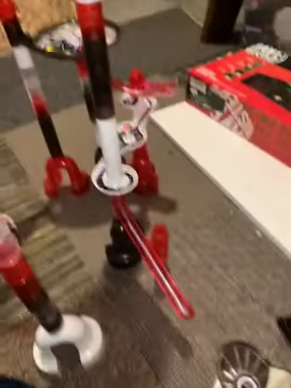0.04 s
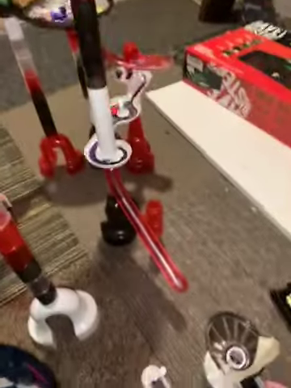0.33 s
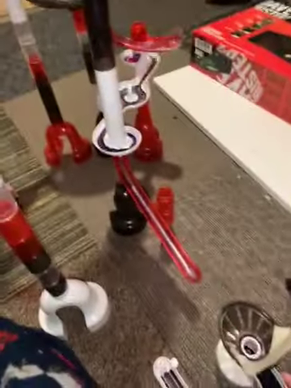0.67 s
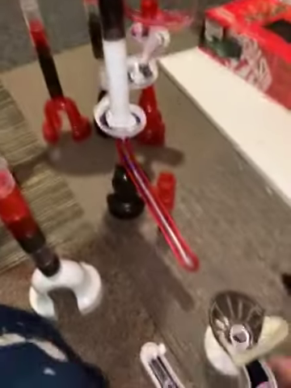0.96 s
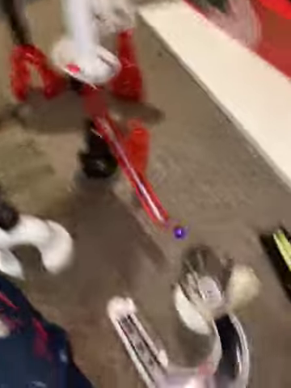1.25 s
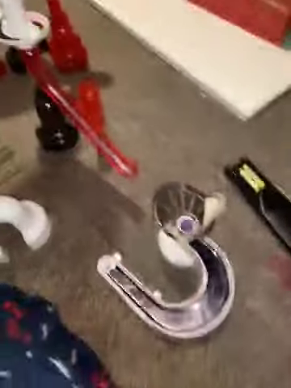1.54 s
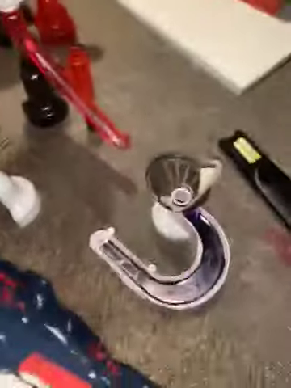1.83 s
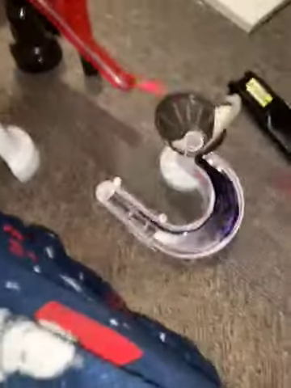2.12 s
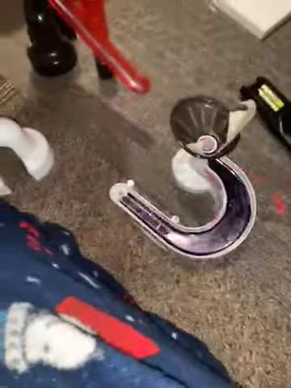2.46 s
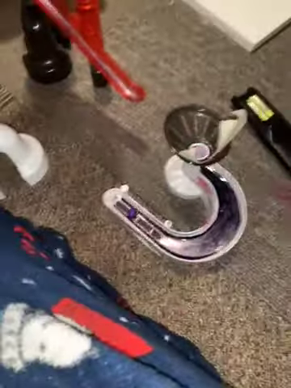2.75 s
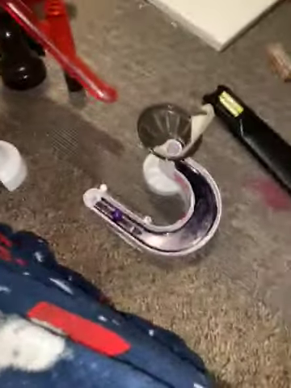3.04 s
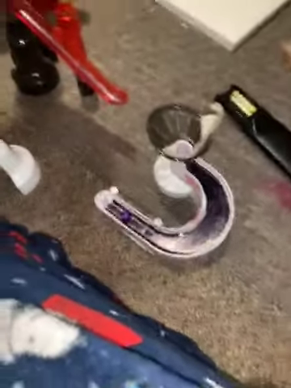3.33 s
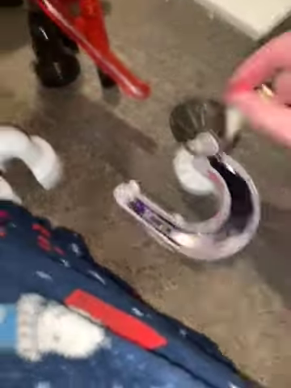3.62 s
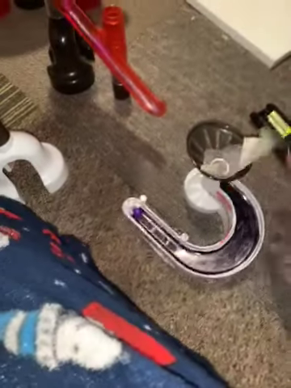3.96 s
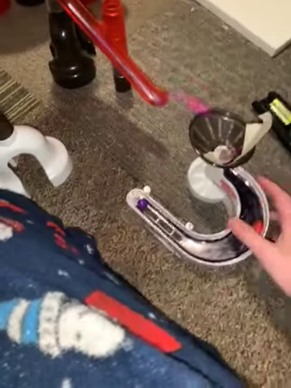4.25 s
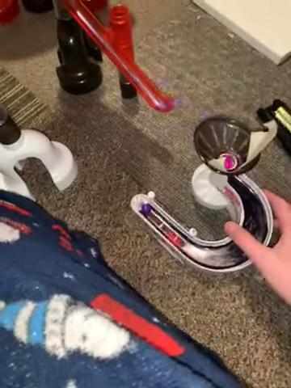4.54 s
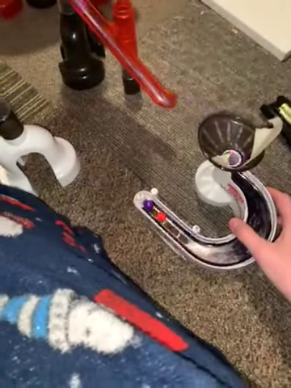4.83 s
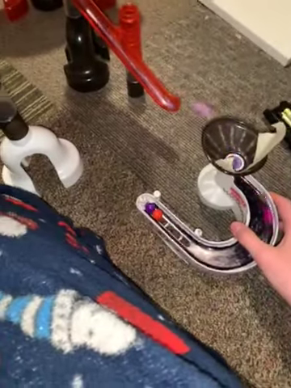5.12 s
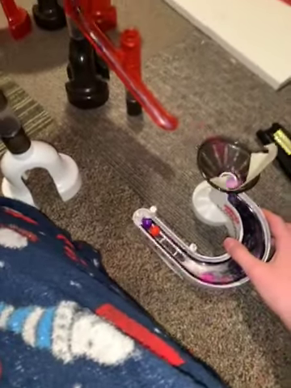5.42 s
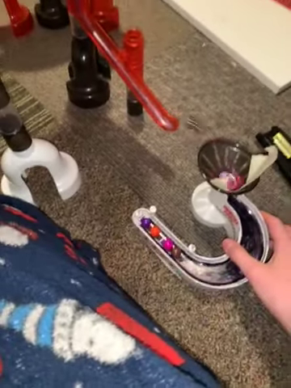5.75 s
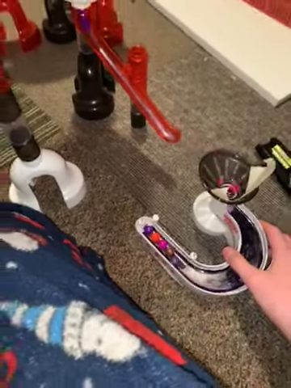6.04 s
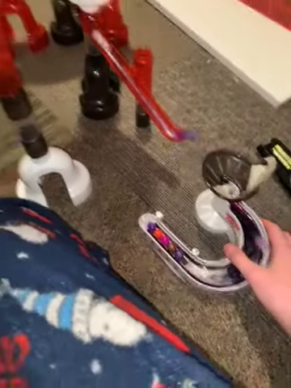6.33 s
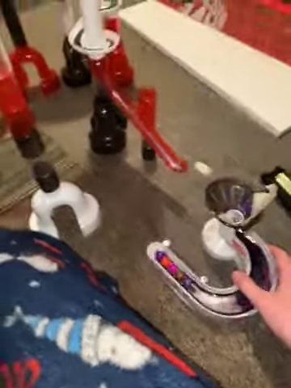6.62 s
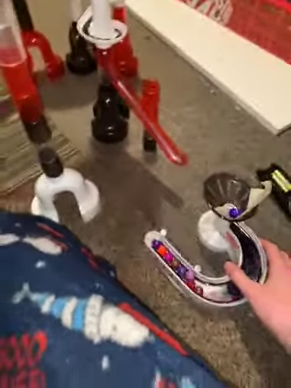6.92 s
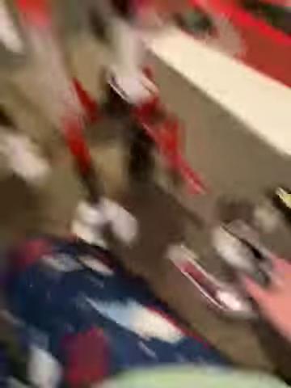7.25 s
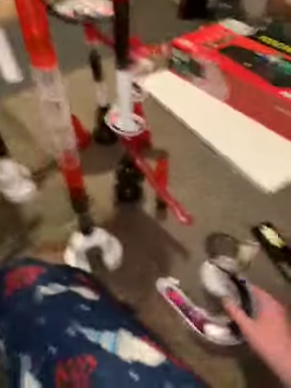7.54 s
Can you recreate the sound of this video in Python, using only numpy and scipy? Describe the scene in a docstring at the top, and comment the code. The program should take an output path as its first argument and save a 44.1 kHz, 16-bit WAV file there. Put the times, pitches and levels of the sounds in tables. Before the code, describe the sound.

Small marbles clatter continuously along a plastic track indoors, with hollow knocks, a rolling rasp and sharp dry taps.

```python
"""Glass marbles run down a plastic marble run on carpet in a small room, over a faint mains hum.
First they roll through the tubes of a tower, droning, rasping and knocking hollow notes out of the walls.
From about 1.4 s they drop into a funnel close by and bounce; then they rattle down a chute, ending in
scattered dry taps. All along the thin plastic rings briefly, glass clicks on glass and the room answers."""
import sys
import numpy as np
from scipy import signal
from scipy.fft import rfft, irfft, next_fast_len
from scipy.io import wavfile

SR = 44100
rng = np.random.default_rng(int(sys.argv[2]) if len(sys.argv) > 2 else 0)


def wrap_up_sound(samples):
    """Save the sound to the file named by the first command line argument, as 16-bit audio."""
    columns = np.atleast_2d(samples).T
    # keep every value between -1 and 1, then stretch to whole-number steps
    tamed = np.clip(columns, -1, 1)
    steps = np.round(tamed * 32767).astype(np.int16)
    wavfile.write(sys.argv[1], SR, steps)


N = 334278

# an impact's four registers (knock, ring, clack, tick): low f/Hz, high f/Hz, decay/(dB/ms), snap height
REGISTERS = [(472, 870, 2, 11.6), (1072, 1810, 0.94, 6.8), (2090, 6640, 1.4, 1.45), (5400, 15600, 1.6, 5)]
# fader moves of the rolling: t/s, track drone level/dB, contact rasp level/dB
ROLLING_LEVELS = [(0.0, -27.5, -31.5), (0.19, -39, -30), (0.36, -36, -33.5), (1.54, -36.5, -39.5),
                  (1.92, -33, -34), (2.09, -37.5, -31), (2.34, -38.5, -32), (2.47, -46, -41.5),
                  (3.17, -39.5, -36), (3.34, -40, -38), (3.74, -40, -33), (3.93, -39.5, -43),
                  (4.24, -42, -40), (4.66, -42, -35), (5.22, -39, -34), (5.57, -41.5, -37),
                  (7.16, -46, -39.5), (7.58, -43.5, -36.5)]


def from_db(db):
    """Decibels to amplitude."""
    return 10 ** (np.asarray(db) / 20)


def rms_one(x):
    """Scales a sound to rms 1."""
    return x / np.sqrt(np.mean(x ** 2) + 1e-20)


def at_hz(points, hz):
    """Reads a table along a log-frequency axis."""
    points = np.array(points)
    return np.interp(np.log(np.maximum(hz, 1)), np.log(points[:, 0]), points[:, 1])


def band(x, low_hz, high_hz, order=2):
    """Causal band-pass."""
    edges_hz = [low_hz, min(high_hz, SR / 2 - 100)]
    return signal.sosfilt(signal.butter(order, edges_hz, "band", fs=SR, output="sos"), x)


def coloured(x, spectrum):
    """Puts an EQ curve on a continuous sound."""
    size = next_fast_len(N)
    gain = from_db(at_hz(spectrum, np.fft.rfftfreq(size, 1 / SR)))
    return irfft(rfft(x, size) * gain, size)[:N]


def resonance(x, hz, width):
    """A single mode, gain 1 at its peak."""
    r = np.exp(-np.pi * width / SR)
    feedback = [1, -2 * r * np.cos(2 * np.pi * hz / SR), r * r]
    return signal.lfilter(np.array([1, 0, -1]) * (1 - r * r) / 2, feedback, x + 1e-18)


def drift(rate):
    """A random modulator that glides to a new value rate times a second."""
    knots = rng.standard_normal(4000)
    return np.interp(np.arange(N) / SR * rate, np.arange(len(knots)), knots)


def bumps(per_s, size_db, shake_s):
    """Tiny random bumps of uneven size, each shaking the shell for a moment; rms 1."""
    sizes = from_db(size_db * np.minimum(rng.exponential(1, N), 3))
    sizes *= rng.random(N) < per_s / SR
    energy = signal.lfilter([1], [1, -np.exp(-1 / (shake_s * SR))], sizes ** 2 + 1e-18)
    return rms_one(np.sqrt(energy) * rng.standard_normal(N))


def add(out, s, sound):
    """Mixes a short sound in at time s."""
    start = int(np.clip(round(s * SR), 0, N))
    out[start:start + len(sound)] += sound[:N - start]


def room_tone(air_db=-50.5, hum_hz=58.6, hum_db=-63):
    """A bed of still air and faint mains hum."""
    # colour of the air: f/Hz, level/dB
    air_eq = [(20, -40), (45, -10), (70, 1.5), (130, -2.5), (220, -4), (400, -4.5), (1000, -5), (4000, -2),
              (16000, -42)]
    air = from_db(air_db) * rms_one(coloured(rng.standard_normal(N), air_eq))
    hum = np.sqrt(2) * np.sin(2 * np.pi * hum_hz * np.arange(N) / SR)
    return air + hum * from_db(hum_db + drift(rate=4.3))


def echoes(predelay_s=0.011, near_db=-34.0, lumpy_db=4.0):
    """The room's impulse response: nearby things scatter a little at once, then the walls answer."""
    # reverb time: f/Hz, t60/s
    room_t60 = [(200, 0.25), (1200, 0.35), (4000, 0.25), (8000, 0.32), (15000, 0.22)]
    t = np.arange(int(0.45 * SR)) / SR
    knots = t[::40]
    lumps = from_db(lumpy_db * np.interp(t, knots, rng.standard_normal(len(knots))))
    shape = lumps * np.where(t < predelay_s, from_db(near_db), 1) * (t > 0.002)
    mid_fade = from_db(-60 * t / at_hz(room_t60, 2000))
    shape /= np.sqrt(np.sum((shape * mid_fade) ** 2))
    white, echo = rng.standard_normal((2, len(t))), 0
    edges_hz = np.geomspace(100, 18000, 12)
    for k, (low, high) in enumerate(zip(edges_hz, edges_hz[1:])):
        fade = from_db(-60 * t / at_hz(room_t60, np.sqrt(low * high)))
        echo = echo + band(white[k % 2] * shape, low, high) * fade
    return echo


def room_reverb(x, pattern_count):
    """The marbles keep moving, so each short stretch of sound meets another pattern of echoes."""
    patterns, out = [echoes() for _ in range(pattern_count)], np.zeros(N)
    hop = SR // 20
    window = np.sin(np.pi * np.arange(2 * hop) / (2 * hop))
    for k, start in enumerate(range(0, N, hop)):
        piece = x[start:start + 2 * hop]
        add(out, start / SR, signal.fftconvolve(piece * window[:len(piece)], patterns[k % pattern_count]))
    return out


def plastic(x, low_hz=0, high_hz=SR, spread_db=0):
    """Adds the plastic's ringing resonances within a frequency range."""
    # modes of the plastic parts: f/Hz, width/Hz, level/dB
    modes = [(580, 187, 3), (652.5, 12, 8), (1155, 7.7, -1), (1270, 64, 3.5), (1478, 87, -2.5),
             (1740, 80, -5.5), (2290, 41, -2.5), (2640, 170, -10.5), (3520, 140, -12), (4530, 220, -11.5)]
    out = x.copy()
    for hz, width, db in modes:
        if low_hz < hz < high_hz:
            gain = from_db(db + spread_db * rng.standard_normal(x.shape[:-1] + (1,)))
            out += resonance(x, hz, width) * gain
    return out


def tower_rumble(t):
    """The tall tower rumbles while marbles run through it."""
    # the rumble's fader: t/s, level/dB
    fader = [(0, -56), (.6, -52), (2.35, -53), (2.6, -61)]
    # its colour: f/Hz, level/dB
    rumble_eq = [(30, -4), (110, 5), (200, -2.5), (380, 5), (600, 0), (2000, -40)]
    rumble = rms_one(coloured(bumps(per_s=390, size_db=-19.0, shake_s=0.051), rumble_eq))
    return rumble * from_db(np.interp(t, *np.transpose(fader)))


def tube_tone():
    """Marbles running inside the tower keep the modes of its tubes sounding; rms 1."""
    # hollow tones of the tubes: f/Hz, width/Hz, level/dB
    modes = [(804, 19, -5), (1164, 43, -3.5), (1236, 49, -1.5), (1300, 93, -0.5), (1628, 160, -6.5)]
    shaking = bumps(per_s=340, size_db=3.0, shake_s=0.0056)
    tones = (from_db(db) * resonance(resonance(shaking, hz, width), hz, width) for hz, width, db in modes)
    return rms_one(sum(tones))


def track_drone(t):
    """Rolling marbles shake the track into a drone, part of it from inside the tubes."""
    # colour of the open track: f/Hz, level/dB
    drone_eq = [(100, -48), (350, -11), (650, -22.5), (820, -6), (1000, -4.5), (1200, -8), (1500, -4.5),
                (1780, -6), (2000, -7.5), (2400, -9), (3500, -15), (9000, -36)]
    # the tubes' part in the drone: t/s, share of power
    tube_share = [(1.3, 0.33), (1.6, 0.17)]
    s, level_db, _ = np.transpose(ROLLING_LEVELS)
    shaking = bumps(per_s=480, size_db=4.5, shake_s=0.0044)
    open_track = rms_one(plastic(coloured(shaking, drone_eq)))
    in_tubes = np.interp(t, *np.transpose(tube_share))
    drone = np.sqrt(1 - in_tubes) * open_track + np.sqrt(in_tubes) * tube_tone()
    return drone * from_db(np.interp(t, s, level_db))


def seam_touches(per_s=190, vary_db=3.0):
    """Light touches on seams and walls, each broadband with a colour of its own."""
    highs_hz = np.geomspace(1500, 16000, 8)
    lows_hz = np.r_[100, highs_hz[:-1]]
    touches = bumps(per_s, size_db=4.5, shake_s=0.0025)
    return sum((-1) ** k * band(touches, low, high) * from_db(vary_db * drift(per_s))
               for k, (low, high) in enumerate(zip(lows_hz, highs_hz)))


def contact_rasp(t, lull_fade_s=0.011, fizz_hz=6500, fizz_slope=0.32):
    """Marbles chatter over the seams with a rasp that brightens with speed."""
    # the chatter lets up in smooth runs or flight, until the next landing: start/s, end/s, change/dB
    lulls = [(0.07, 0.137, -13), (0.376, 0.521, -23), (2.094, 2.256, -24), (2.44, 2.545, -3),
             (2.98, 3.185, -17), (3.543, 3.72, -10.5), (4.264, 4.35, -10), (5.707, 5.804, 1.5),
             (6.298, 6.467, -3), (6.553, 6.708, -4.5), (6.93, 7.155, -1), (7.314, 7.401, -9)]
    # colour of the rasp: f/Hz, level/dB
    rasp_eq = [(200, -17.5), (380, -6.5), (600, -9), (900, -21), (1500, -1), (2000, -3), (2400, -0.5),
               (3200, 0.5), (5200, -2.5), (7500, -8), (12000, -18), (16000, -23)]
    s, _, fader_db = np.transpose(ROLLING_LEVELS)
    dips_db = sum(db * np.clip((t - start) / lull_fade_s, 0, 1) * (t < end) for start, end, db in lulls)
    level_db = np.interp(t, s, fader_db) + dips_db
    rasp = rms_one(plastic(coloured(seam_touches(), rasp_eq)))
    dull = signal.sosfiltfilt(signal.butter(2, fizz_hz, fs=SR, output="sos"), rasp)
    fizz_gain = np.minimum(from_db(fizz_slope * (level_db - np.median(level_db))), 2)
    return (dull + (rasp - dull) * fizz_gain) * from_db(level_db)


def rolling(trim_db=-2.5, sway_db=1.5):
    """Drone and rasp waver as the marbles sway from wall to wall, with the tower's rumble below."""
    t = np.arange(N) / SR
    gain = from_db(trim_db + sway_db * drift(rate=35))
    return (track_drone(t) + contact_rasp(t)) * gain + tower_rumble(t)


def glass_clicks(fall_db_per_ms=2.0, width_share=0.29):
    """Two marbles meet, glass on glass, in a very brief, bright click."""
    # collisions: t/s, level/dB, centre f/Hz
    clicks = [(0.851, -37, 8900), (1.147, -39, 10300), (1.369, -38, 14000), (2.725, -38, 7500),
              (3.101, -45.5, 5860), (3.662, -46, 9400), (4.121, -40, 12000), (4.633, -43, 9000),
              (4.872, -38, 12500), (5.795, -41, 12000), (6.137, -42, 7000), (6.432, -50, 9000),
              (6.482, -39, 10000), (6.692, -48, 9500), (6.722, -41, 9500), (6.734, -40, 8000),
              (6.855, -40, 10000), (7.048, -36, 8900), (7.215, -47, 8000), (7.521, -41, 7000),
              (7.549, -36.5, 10400)]
    out, ms = np.zeros(N), np.arange(SR // 50) * 1000 / SR
    attack = ms < 7
    for s, db, hz in clicks:
        burst = rng.standard_normal(len(ms)) * from_db(-fall_db_per_ms * ms)
        click = resonance(burst, hz, width_share * hz)
        add(out, s, click * from_db(db) / np.sqrt(np.mean(click[attack] ** 2)))
    return out


def pings():
    """A blow sets one mode singing: mostly of the track, funnel or chute, but at 6.741 s of two marbles
    meeting, glass on glass."""
    # ringing modes: t/s, f/Hz, peak level/dB, t60/s
    notes = [(1.385, 950, -22, 0.016), (1.385, 2340, -29, 0.046), (1.536, 654, -27.5, 0.17),
             (1.563, 640, -27, 0.072), (2.27, 671, -29, 0.14), (2.27, 1478, -19, 0.08),
             (2.318, 640, -26.5, 0.06), (2.318, 1220, -24, 0.03), (3.988, 4570, -11.5, 0.019),
             (5.26, 2290, -30, 0.18), (5.83, 2290, -37.5, 0.56), (6.617, 4400, -26, 0.013),
             (6.741, 7600, -22.5, 0.016), (6.897, 1834, -25.5, 0.052), (7.257, 1180, -38, 0.18)]
    out, t = np.zeros(N), np.arange(SR // 4) / SR
    for s, hz, db, t60 in notes:
        add(out, s, np.sin(2 * np.pi * hz * t) * from_db(db - 60 * t / t60))
    return out


def tube_knocks(trim_db=-0.5, rise_s=0.00078, knock_t60_s=0.023, ring_hz=1202, ring_db=-25, ring_t60_s=0.34):
    """A marble landing in a tube gives a short hollow knock; one tube mode rings on softly."""
    # landings: t/s, level/dB, f/Hz
    landings = [(0.058, -15, 1350), (0.199, -18, 1300), (0.2961, -9.5, 1215), (0.396, -13, 1203),
                (0.5245, -14.5, 1215), (0.5636, -26, 1220), (0.7857, -36, 1320), (0.9934, -9.5, 1250),
                (1.034, -16, 1220), (1.0475, -14.5, 1170), (1.108, -18, 1270), (1.1537, -17, 1210),
                (1.6916, -16, 1270), (2.626, -21, 1270), (2.7517, -23, 1300), (2.911, -28, 1300),
                (3.512, -22, 1330), (7.2568, -28, 1360)]
    out, t = np.zeros(N), np.arange(SR // 4) / SR
    onset = 1 - np.exp(-t / rise_s)
    ring = np.sin(2 * np.pi * ring_hz * t) * from_db(ring_db - 60 * t / ring_t60_s)
    for s, db, hz in landings:
        knock = np.sin(2 * np.pi * hz * t) * from_db(-60 * t / knock_t60_s)
        add(out, s, (knock + ring) * onset * from_db(db + trim_db))
    return out


def with_rebounds(hits, loss_db=13):
    """After each hit the marble touches down once more, softer."""
    # flight time: shortest/s, longest/s
    flight_s = (0.012, 0.049)
    rebounds = [(s + rng.uniform(*flight_s), db - loss_db, *rest) for s, db, *rest in hits]
    return list(hits) + rebounds


def voice_impact(voicing, s, level_db, clack_hz, hardness_db=0, extra_knock_db=0, extra_send_db=0):
    """Shares one impact among the registers; a harder, briefer contact has more tick and less ring."""
    # dB gained per dB of hardness: knock, ring, clack, tick
    hardness_tilt = (0.3, -1.16, -0.29, 1)
    *registers_db, send_db = voicing
    levels_db = level_db + np.array(registers_db) + hardness_db * np.array(hardness_tilt)
    knock_db, *upper_db = levels_db + rng.standard_normal(len(REGISTERS))   # never twice quite alike
    return [s, knock_db + extra_knock_db, *upper_db, clack_hz, send_db + extra_send_db]


def impact_cues():
    """Every marble hit on the plastic: t/s, knock/dB, ring/dB, clack/dB, tick/dB, clack f/Hz, send/dB."""
    # strikes on the tower's walls, further off: t/s, level/dB, clack f/Hz, hardness/dB
    wall_hits = [(0.057, -31, 2940, 6), (0.137, -26, 2670, 0.5), (0.174, -29.5, 3480, -1),
                 (0.199, -28, 5560.0, -5), (0.296, -23, 2510, 1), (0.395, -25, 4430, 1.5),
                 (0.524, -25.5, 4300, -3), (0.636, -34, 2340, -8), (0.659, -27.5, 4630, 0),
                 (0.766, -27.5, 2530, -1.5), (0.787, -32, 2300.0, -4), (0.877, -28, 2540, 0.5),
                 (0.915, -21, 3350, 2), (0.993, -21, 3800.0, 1), (1.034, -32, 2760.0, 0),
                 (1.048, -26.5, 2700, 2.5), (1.154, -29.5, 3200.0, -5), (1.168, -24, 3860.0, 1.5),
                 (1.228, -24.5, 4000, 2), (1.298, -29.5, 3360.0, 0), (1.354, -26, 2320, 1),
                 (1.37, -31, 2300, -4), (1.426, -28, 2300.0, 3.5), (1.692, -22.5, 2900, 4.5),
                 (1.981, -24.5, 3420, 0.5), (1.998, -29, 4640.0, 6), (2.019, -25, 2740, -3),
                 (2.342, -26.5, 2520, 3.5), (2.626, -24.5, 5030, 3.5), (2.752, -24, 3180, 3),
                 (2.911, -28, 3300, 1.5), (3.434, -29.5, 3520.0, 0), (3.512, -26.5, 3120, 3.5),
                 (3.708, -26, 4630, 3), (3.724, -23.5, 2680, 0), (4.435, -27, 2860, 1.5),
                 (4.581, -29, 4500, 0), (7.256, -26, 4500, 0), (7.414, -30, 4340, -2.5),
                 (7.46, -29, 4000, 2)]
    # drops and bounces on funnel and chute:
    # t/s, level/dB, clack f/Hz, hardness/dB, extra knock/dB, extra room send/dB
    drops = [(1.384, -20, 2240, 2.5, -1.5, -0.5), (1.535, -24, 2310, -4.5, 3, -5),
             (1.562, -24.5, 2250, -3, 2.5, 0.5), (1.745, -17, 3430, 3, -4, 0),
             (1.825, -25.5, 3180, -2, 4.5, -14), (1.884, -29.5, 3520.0, -4, 6, -6),
             (2.056, -30, 3170, 3, 3, 8.5), (2.262, -31, 2900.0, -6.5, 10, -8),
             (2.269, -26.5, 3560.0, -8, 7, 0), (2.275, -23.5, 3900, -2.5, 6.5, -4.0),
             (2.317, -23.5, 2330, 1, 4.5, -7), (2.4, -28, 3600, -6.5, 7, 2), (2.417, -31, 2600, 0, -2, 3),
             (2.506, -30.5, 3220, -4, -4, -21), (3.332, -23, 2440, 0.5, -4.5, 4),
             (3.841, -22, 3100, -0.5, -4, 2.5), (3.987, -25.5, 4470, 2.5, 0, -6),
             (4.763, -26.5, 2560.0, 2.5, -3.5, 7), (5.809, -30, 5200, 2.5, -1, 1.5),
             (6.532, -34.5, 2640, 0, 4.5, -1)]
    # rattles round the funnel and the chute: t/s, level/dB, clack f/Hz, hardness/dB
    rattles = [(1.617, -28.5, 4400, -2), (1.663, -28, 3560, -3.5), (1.846, -25.5, 3940, 0.5),
               (2.545, -32, 3240.0, -2), (2.57, -28, 4030, -1.5), (3.187, -32.5, 3800.0, -2),
               (3.208, -33, 3630, -6), (3.232, -32, 2540, -3.5), (3.965, -25.5, 2840, 6.5),
               (4.002, -26.5, 2460.0, 3), (4.106, -29.5, 2490, 0.5), (4.185, -30, 3420.0, 0.5),
               (4.352, -27.5, 2760.0, 4.5), (4.363, -29, 2520, 0), (4.554, -29.5, 4030, -3.5),
               (4.6, -38, 2740.0, -10), (4.705, -26.5, 2460, 1.5), (4.885, -26.5, 4980.0, -0.5),
               (4.969, -25.5, 4430, -0.5), (5.05, -31, 4000, -2), (5.076, -30.5, 3580, -3.5),
               (5.093, -32, 2820.0, 6), (5.151, -32.5, 2300.0, -3.5), (5.227, -26.5, 3600, -0.5),
               (5.251, -25, 2460, 3.5), (5.29, -27, 5600, -1.5), (5.343, -25, 4960, -0.5),
               (5.359, -29, 5400, 1), (5.422, -34, 2360.0, 1), (5.489, -25, 2760, 2.5),
               (5.573, -31, 3800, -1.5), (5.61, -25.5, 3580.0, 1), (5.632, -28, 3320, 1.5),
               (5.873, -32, 2300.0, -1.5), (5.893, -27, 2680, 6.5), (6.01, -27, 4570, 1),
               (6.056, -30.5, 4470, 1), (6.159, -28, 3940.0, -1), (6.173, -37, 3460, -4),
               (6.235, -24.5, 4720, 3.5), (6.26, -26, 3700, -0.5), (6.385, -27.5, 4540, 2),
               (6.469, -27.5, 3520.0, 0), (6.508, -25, 2830, 4.5), (6.739, -28, 3300, 3),
               (6.765, -25, 3180, 2), (6.833, -31, 3260, 1), (6.871, -28, 2770, 5.5)]
    # short dry taps on the near end of the chute: t/s, level/dB, clack f/Hz
    taps = [(1.59, -24, 3420.0), (1.907, -24, 3460), (3.152, -37, 2500), (3.382, -35, 2420),
            (3.669, -38, 3700), (4.028, -24, 4480.0), (4.134, -24, 5000), (4.247, -32, 4370),
            (4.487, -32.5, 3720.0), (4.661, -28, 3350), (4.744, -20.5, 4600), (4.986, -26, 4100),
            (5.026, -29, 3900), (5.927, -25, 4580), (6.323, -29, 2720), (6.615, -25.5, 4530),
            (6.677, -27.5, 2680), (6.898, -30, 3500.0), (7.003, -30, 4100), (7.099, -28.5, 2600.0),
            (7.169, -30, 5000), (7.549, -28, 2640.0)]
    # voicing of each kind: hollow knock/dB, wall ring/dB, clack/dB, glassy tick/dB, room send/dB
    wall_voicing = (-23, -4, -2, -15, 1.5)
    drop_voicing = (-7, -6, -1.5, -13.5, -0.6)
    rattle_voicing = (-15.5, -7.5, -1.5, -11.5, 2)
    tap_voicing = (-13.5, -13.5, -3.5, -16, -1)
    kinds = [(with_rebounds(wall_hits), wall_voicing), (drops, drop_voicing),
             (with_rebounds(rattles), rattle_voicing), (taps, tap_voicing)]
    return np.array([voice_impact(voicing, *hit) for hits, voicing in kinds for hit in hits])


def clatter(cues, towards_walls, spot_db=3.0, spot_width=0.12, contact_hz=5000, brightening=0.69):
    """Each impact is a snap and a few milliseconds of dense shell modes, heard direct or sent to the walls."""
    # the first marbles knock higher on the funnel than the later ones: t/s, pitch ratio
    knock_pitch = [(2.45, 1.44), (2.55, 1.03)]
    times, *levels_db, clacks_hz, sends_db = cues.T
    knock, _, clack, tick = range(len(REGISTERS))
    ms = np.arange(SR // 14) * 1000 / SR
    attack = ms < 7
    # glass on glass is a shorter contact than glass on plastic: the more tick, the more open the top
    glassiness_db = levels_db[tick] - levels_db[clack]
    cutoffs_hz = contact_hz * from_db(brightening * (glassiness_db - glassiness_db.mean()))
    cutoffs_hz = np.clip(cutoffs_hz, SR / 20, SR / 3)
    blows = 0
    for register, (low_hz, high_hz, fall_db_per_ms, snap) in enumerate(REGISTERS):
        force = rng.standard_normal((len(cues), len(ms))) * from_db(-fall_db_per_ms * ms)
        force[:, 0] += snap
        pitches = np.interp(times, *np.transpose(knock_pitch)) if register == knock else np.ones(len(cues))
        for pitch in np.unique(pitches):
            force[pitches == pitch] = band(force[pitches == pitch], pitch * low_hz, pitch * high_hz, order=3)
        layer = plastic(force, low_hz, high_hz)
        if register == clack:   # the clack favours a pitch that depends on the spot struck
            spots = np.array([resonance(hit, hz, spot_width * hz) for hit, hz in zip(layer, clacks_hz)])
            layer += from_db(spot_db) * spots
        layer = np.array([signal.lfilter(*signal.butter(1, hz, fs=SR), hit)
                          for hit, hz in zip(layer, cutoffs_hz)])
        layer /= np.sqrt(np.mean(layer[:, attack] ** 2, axis=1, keepdims=True))
        blows = blows + layer * from_db(levels_db[register])[:, None]
    out = np.zeros(N)
    for s, send_db, blow in zip(times, sends_db, blows):
        add(out, s, blow * from_db(send_db) if towards_walls else blow)
    return out


def scene(wet_db=-2.5, ringing_send_db=-1.5, directions=2):
    """The mono mix; the clatter radiates other modes in each direction, each with its own room echoes."""
    cues = impact_cues()
    track = rolling()
    ringing = pings() + tube_knocks() + glass_clicks()
    clatter_echo = sum(room_reverb(clatter(cues, towards_walls=True), pattern_count=4)
                       for _ in range(directions)) / np.sqrt(directions)
    track_echo = room_reverb(track + from_db(ringing_send_db) * ringing, pattern_count=5)
    reverb = from_db(wet_db) * (clatter_echo + track_echo)
    return (clatter(cues, towards_walls=False) + track + ringing + reverb + room_tone())[None]


def record(dry, low_cut_hz=42, high_cut_hz=15900):
    """The small microphone loses the deep bass, and the top is cut steeply."""
    thin = signal.sosfilt(signal.butter(4, low_cut_hz, "high", fs=SR, output="sos"), dry)
    return signal.sosfilt(signal.ellip(10, 0.2, 70, high_cut_hz, fs=SR, output="sos"), thin)


dry = scene()
out = record(dry)
wrap_up_sound(out)
```